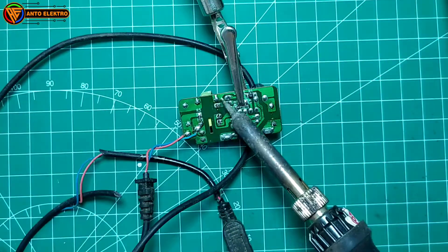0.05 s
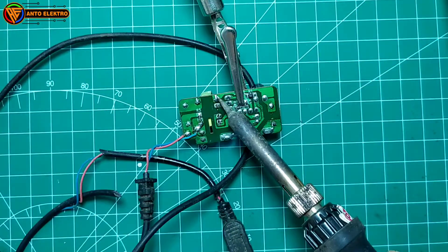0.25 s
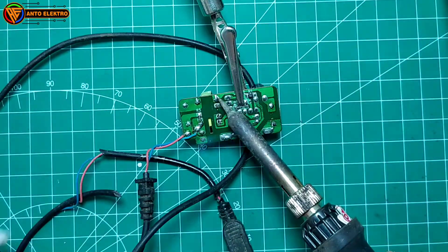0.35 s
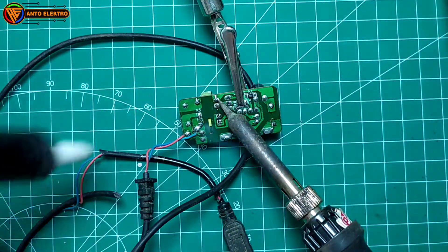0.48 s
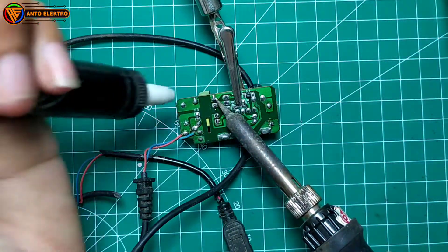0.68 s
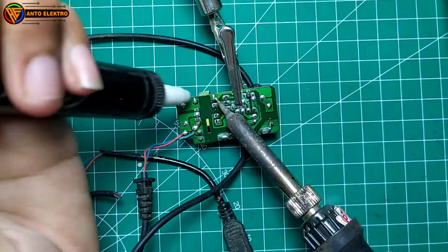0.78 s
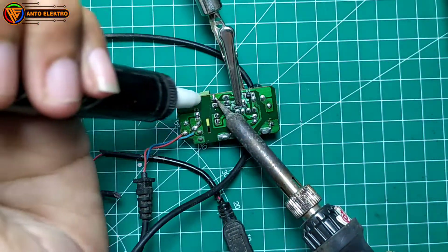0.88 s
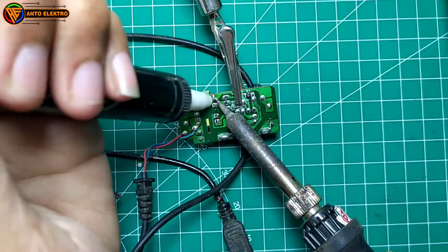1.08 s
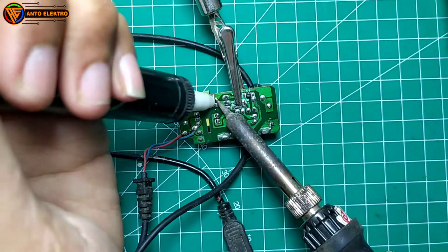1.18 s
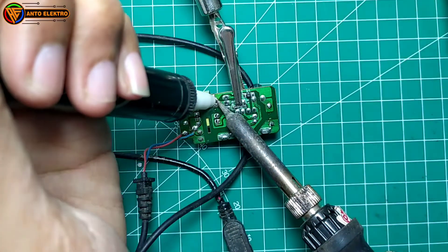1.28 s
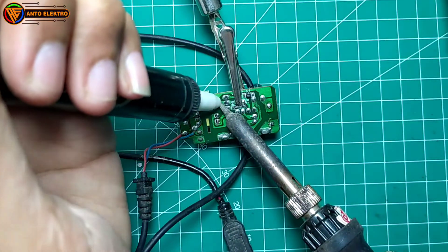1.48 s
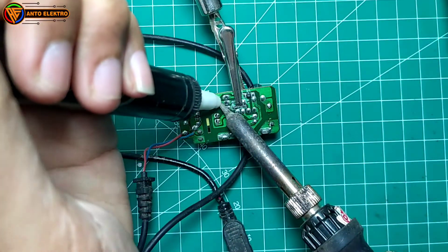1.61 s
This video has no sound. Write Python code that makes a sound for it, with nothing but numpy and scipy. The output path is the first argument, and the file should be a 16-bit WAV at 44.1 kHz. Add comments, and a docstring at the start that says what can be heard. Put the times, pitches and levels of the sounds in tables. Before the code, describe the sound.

Close stereo microphones catch a hand-held solder pump being cocked: ticks, gritty plunger scrape, loud bright snap with a puff of air, a weaker hollow clack, short room ring, then a soft low thump.

```python
"""In a small live room an earlier click is dying away as a hand grips a spring-loaded solder sucker, close by on the right.
Loose plastic ticks; the plunger rasps down the barrel (slips and hiss), its spring knocking out low modes and a squeak rising.
It latches with a hard snap (noise bursts, coil sines), a thud and a puff of air on the right microphone port,
then clacks back against the catch as the thumb lets go and lands again, ringing the hollow barrel.
A soft bump sets the bench humming in beating low modes; one very faint tick follows, over quiet rumble and hiss."""
import sys
import numpy as np
from scipy import signal
from scipy.fft import rfft, irfft, next_fast_len
from scipy.io import wavfile

SR = 44100
rng = np.random.default_rng(int(sys.argv[2]) if len(sys.argv) > 2 else 0)


def pcm_store(signal):
    """Save signal as 16-bit PCM."""
    levels = np.round(np.clip(np.atleast_2d(signal), -1, 1) * 32767)
    wavfile.write(sys.argv[1], SR, levels.astype(np.int16).T)


N = 72765
TIME = np.arange(N) / SR
LEFT_LAG_S = .00043  # sound from the right reaches the left port later


def from_db(db):
    """Decibels to gain."""
    return 10 ** (np.asarray(db) / 20)


def rms_one(x):
    """Scale to unit rms."""
    return x / np.sqrt(np.mean(x ** 2) + 1e-20)


def colour(x, points):
    """Causal (minimum-phase) filter through (f/Hz, level/dB) points, with unit power gain."""
    size = next_fast_len(2 * N)
    hz, db = np.transpose(points)
    grid = np.maximum(np.fft.rfftfreq(size, 1 / SR), 1)
    level_db = np.interp(np.log(grid), np.log(hz), db)
    # folding the cepstrum forward in time gives minimum phase
    cepstrum = irfft(np.log(from_db(level_db)), size)
    cepstrum[1:size // 2] *= 2
    cepstrum[size // 2 + 1:] = 0
    response = np.exp(rfft(cepstrum))
    response = response / np.sqrt(np.mean(np.abs(response) ** 2))
    return irfft(rfft(x, size) * response, size)[..., :N]


def late_left(x):
    """The same sound at both ports, the left one late."""
    return np.array([np.roll(x, int(LEFT_LAG_S * SR)), x])


def noise(points, likeness=0.39, envelope=1):
    """Stereo noise under an envelope, then coloured; likeness is the power share common to both ports."""
    white = rng.standard_normal((3, N))
    both = np.sqrt(likeness) * late_left(white[2]) + np.sqrt(1 - likeness) * white[:2]
    return colour(envelope * both, points)


def slow_noise(hz):
    """Random wander up to the given rate, rms 1."""
    lowpass = signal.butter(2, hz, fs=SR, output="sos")
    return rms_one(signal.sosfilt(lowpass, rng.standard_normal(N)))


def pan(db):
    """Left and right gains of equal total power for a left-right level in dB; negative is right."""
    return rms_one(from_db([[db / 2], [-db / 2]]))


def strike(start, t60, rise):
    """Envelope: quick rise, exponential decay."""
    age = np.maximum(TIME - start, 0)
    return (1 - np.exp(-age / rise)) * from_db(-60 * age / t60)


def mode(start, hz, t60, rise):
    """One decaying sine."""
    return strike(start, t60, rise) * np.sin(2 * np.pi * hz * (TIME - start))


def contact(start, db, t60, side):
    """Left and right envelopes of one contact, the left one a little late."""
    ports = [strike(start + lag, t60, rise=0.0001) for lag in (LEFT_LAG_S, 0)]
    return from_db(db) * pan(side) * np.array(ports)


def snaps():
    """The catch is hit in quick clusters; each hit rings the plastic body, the steel and the coil."""
    # blows on the catch: t/s, level/dB, ring t60/s, body share/dB, steel share/dB, left-right/dB
    blows = [(0.3559, 0.5, .014, -6, 3.5, -10), (0.3618, -5.5, .012, -2, -2, -3.5),
             (0.3644, -2, 0.0056, 2.5, 2.5, 5), (0.4429, -10, .022, -10.5, 2, -14),
             (0.4463, -22.5, 0.024, 1, 7.5, -16), (0.451, -17.5, 0.023, -2.5, -24, -4.5),
             (0.4528, -14, 0.016, 1.5, -6, 23.5)]
    # coil singing on after each blow: f/Hz, level/dB, t60/s
    coil_modes = [(2740, -27, 0.048), (4250, -23.5, .03), (5157, -39.5, .15), (5690, -35, 0.17),
                  (6230, -35, 0.17), (8146, -33.5, .15), (9038, -26.5, .14), (9310, -33, 0.13),
                  (9505, -30, .16), (10200, -32.5, 0.18), (12100, -28.5, 0.11), (11785, -36, 0.13)]
    # plastic body colour: f/Hz, level/dB
    body_tone = [(200, -18.5), (900, -9), (1450, -11.5), (2100, -7.5), (2900, -7), (3400, -0.5), (4300, 2),
                 (5400, -6), (6400, 0.5), (7200, -12.5), (10000, -12.5), (14000, -25.5), (17000, -36.5)]
    # steel ring colour: f/Hz, level/dB
    steel_tone = [(500, -41.5), (3000, -37), (6500, -11.5), (7400, -10), (8300, 1), (8900, 4), (9400, 1),
                  (10200, -13.5), (11000, -13.5), (12200, -17), (13600, -11.5), (15000, -27.5),
                  (17000, -36.5)]
    body = sum(contact(s, db + body_db, t60, side) for s, db, t60, body_db, _, side in blows)
    steel = sum(contact(s, db + steel_db, t60, side) for s, db, t60, _, steel_db, side in blows)
    hits = np.zeros((2, N))
    for s, db, *_, side in blows:
        hits[:, int(s * SR)] = from_db(db) * pan(side)[:, 0] * rng.choice([-1, 1], 2)
    coil = sum(from_db(db) * mode(0, hz, t60, rise=0.0012) for hz, db, t60 in coil_modes)
    singing = signal.fftconvolve(hits, coil[None], axes=1)[:, :N]
    body_sound = noise(body_tone, likeness=.6, envelope=body)
    steel_sound = noise(steel_tone, likeness=.6, envelope=steel)
    return body_sound + steel_sound + singing


def piston():
    """Juddering slips and hiss as the piston slides and catches; returns the rasp and a rough rising squeak."""
    # rub of the piston in the barrel: t/s, level/dB
    rub_points = [(0.15, -68.5), (0.162, -39), (0.188, -33.5), (0.21, -41), (0.228, -21.5), (0.27, -22.5),
                  (0.305, -18.5), (0.335, -22), (0.348, -27), (0.36, -33.5), (0.372, -68.5)]
    # catches on its way: t/s, level/dB, t60/s
    catch_points = [(0.2325, -23, 0.01), (0.2715, -17.5, 0.043), (0.3175, -16, 0.022),
                    (0.3312, -14.5, 0.02)]
    # rasp colour: f/Hz, level/dB
    rasp_tone = [(150, -16), (600, -14), (1400, -13), (2500, -8), (3300, -6), (4400, 3), (5200, -2.5),
                 (6200, 6.5), (7200, -4.5), (9000, 4.5), (10400, -8.5), (12000, -4.5), (13000, -24.5),
                 (15000, -36)]
    slips_per_s, slip_share = 2200, .5  # share of amplitude; hiss fills up the power
    judder_hz, judder_db = 70, 2.46
    squeak_s, squeak_spread_s, squeak_db = .265, 0.032, -0.5  # middle, Gaussian spread, level against the rub
    squeak_hz, squeak_rise_hz_per_s, squeak_width_hz = 11360, 7100, 330

    slips = (rng.random(N) < slips_per_s / SR) * rng.choice([-1, 1], N) * rng.random(N)
    slips = rms_one(colour(late_left(slips), rasp_tone))
    hiss = noise(rasp_tone, likeness=0.24)
    rasp = slip_share * slips + np.sqrt(1 - slip_share ** 2) * hiss
    rub_db = np.interp(TIME, *np.transpose(rub_points), left=-120, right=-120)
    rub = from_db(rub_db + judder_db * slow_noise(judder_hz))
    catches = sum(from_db(db) * strike(s, t60, rise=.001) for s, db, t60 in catch_points)

    since_middle = TIME - squeak_s
    phase = 2 * np.pi * np.cumsum(squeak_hz + squeak_rise_hz_per_s * since_middle) / SR
    # two slow wanders roughen the tone, separately at each port
    squeak = np.array([slow_noise(squeak_width_hz) * np.sin(phase) + slow_noise(squeak_width_hz) * np.cos(phase)
                       for _ in range(2)])
    swell = from_db(squeak_db) * np.exp(-(since_middle / squeak_spread_s) ** 2 / 2)
    return pan(-7) * (rub + catches) * rasp, pan(-9) * rub * swell * squeak


def spring():
    """The buckling spring knocks out the low modes, a little differently each time."""
    # knocks on the barrel wall: t/s, level/dB, treble tilt/dB per octave, left-right/dB
    wall_knocks = [(0.2174, -31.5, -7, -5), (0.303, -27.5, 3, -4.5), (0.3104, -17.5, 2, -7.5),
                   (0.321, -32.5, -1, 10), (0.3331, -25.5, 0, -4)]
    # spring and barrel: f/Hz, level/dB, t60/s
    spring_modes = [(228, -9.5, .14), (305.3, -8.5, 0.1), (359.6, -4.5, 0.097), (416, -6.5, .1),
                    (444.4, -10.5, 0.21), (527, -6.5, 0.04), (870, -11.5, 0.021), (980, -4, 0.057),
                    (1132.3, -16, 0.033)]
    knock_spread_db = 2.0
    out = 0
    for s, db, tilt_db, side in wall_knocks:
        chance_db = rng.normal(0, knock_spread_db, len(spring_modes))
        knock = 0
        for (hz, mode_db, t60), extra_db in zip(spring_modes, chance_db):
            level_db = db + mode_db + extra_db + tilt_db * np.log2(hz / 550)
            knock = knock + from_db(level_db) * mode(s, hz, t60, rise=0.00085)
        out = out + pan(side) * knock
    return out


def ticks():
    """Loose plastic parts touch: the rod pings and the barrel's dense, damped resonances ring briefly."""
    # light contacts: t/s, level/dB, ring t60/s, hollow barrel share/dB, left-right/dB
    touches = [(0.1034, -29.5, 0.026, -15.5, -7), (0.1205, -23, 0.013, -18, -11),
               (0.157, -28.5, 0.051, 3.5, -7.5), (0.1919, -23, .014, -2.5, -8.5),
               (0.2009, -7.5, .012, -18, -14.5), (0.2142, -14, 0.024, 0, -4.5),
               (1.427, -60.5, 0.097, -14, 4)]
    # sharp pings of the plunger rod, rung by every tick: f/Hz, level/dB, t60/s
    rod_modes = [(2010, -23.5, .02), (2560, -16.5, .015), (4128, -10.5, 0.022), (6100, -12, 0.02)]
    # bright contact colour: f/Hz, level/dB
    tick_tone = [(300, -22), (1500, -22.5), (2400, -6), (3200, -16), (4150, 0), (5000, -9), (6100, 3.5),
                 (7200, -9), (8600, -4.5), (10200, -5), (12000, -14.5), (15000, -37)]
    # hollow barrel colour: f/Hz, level/dB
    hollow_tone = [(100, -25), (400, -10.5), (900, -12), (1300, -9), (1750, -0.5), (2050, 1.5), (2600, -12),
                   (5000, -26.5), (14000, -38.5)]
    bright = sum(contact(s, db, t60, side) for s, db, t60, _, side in touches)
    hollow = sum(contact(s, db + hollow_db, t60, side) for s, db, t60, hollow_db, side in touches)
    pings = 0
    for s, db, *_, side in touches:
        ping = sum(from_db(db + mode_db) * mode(s, hz, t60, rise=0.00083) for hz, mode_db, t60 in rod_modes)
        pings = pings + pan(side) * ping
    bright_sound = from_db(-0.5) * noise(tick_tone, likeness=0.9, envelope=bright)
    return bright_sound + noise(hollow_tone, likeness=.9, envelope=hollow) + pings


def thuds():
    """Dull landings of the plunger, the last ringing the hollow barrel; returns direct sound and room send."""
    # landings: t/s, level/dB, t60/s, room send/dB, left-right/dB
    landings = [(0.3664, -18, 0.0092, -18, -10.5), (0.458, -20.5, 0.031, 4.5, -4.5)]
    # dull landing colour: f/Hz, level/dB
    thud_tone = [(100, -25.5), (330, -11.5), (450, -5), (560, -1), (700, -7.5), (860, 4.5), (1080, 1.5),
                 (1350, -12.5), (2100, -17), (3000, -27.5), (12000, -47.5)]
    barrel_hz, barrel_t60_s, barrel_db = 887, 0.07, -5.5  # level against the landing
    sounds = [noise(thud_tone, likeness=0.88, envelope=contact(s, db, t60, side))
              for s, db, t60, _, side in landings]
    s, db, *_, side = landings[-1]
    ring = from_db(db + barrel_db) * pan(side) * mode(s, barrel_hz, barrel_t60_s, rise=0.00036)
    send = sum(from_db(row[3]) * sound for row, sound in zip(landings, sounds))
    return sum(sounds) + ring, send


def puff():
    """A pressure pulse hits the right microphone port, which thumps and swings back slowly."""
    puff_s, rise_s, decay_s, puff_db = .3695, 0.0027, .1, -9.5
    ring_hz, ring_t60_s, ring_db = 161, 0.067, -22.5
    mic_low_hz = 4.2
    age = np.maximum(TIME - puff_s, 0)
    push = -from_db(puff_db) * np.exp(-age / decay_s) * (1 - np.exp(-age / rise_s))
    swing = signal.sosfilt(signal.butter(2, mic_low_hz, "high", fs=SR, output="sos"), push)
    thump = from_db(ring_db) * mode(puff_s, ring_hz, ring_t60_s, rise=.001)
    return pan(-39) * swing / np.sqrt(2) + pan(-20) * thump


def handling():
    """Low rustle of the hand gripping the pump, fading just after the release clack."""
    # rustle colour: f/Hz, level/dB
    handling_tone = [(25, 0), (70, -0.5), (120, -13), (180, 2), (230, -0.5), (310, -9.5), (420, -5.5),
                     (600, -14), (2000, -30), (10000, -60)]
    level_db, end_s, fade_s = -49, 0.45, .12
    grip = np.exp(-np.maximum(TIME - end_s, 0) / fade_s)
    return from_db(level_db) * pan(-2) * noise(handling_tone, likeness=.6, envelope=grip)


def bench():
    """A soft bump: close low modes swell, beat and die away over a faint dull brush."""
    # the bumped bench fitting: f/Hz, level/dB, t60/s
    bench_modes = [(164, -73, .35), (175.2, -25, 0.5), (186, -37.5, 0.56), (227.4, -35, 0.32),
                   (248, -43, 0.36), (290, -48, 0.4)]
    bump_s, swell_s = .769, 0.033
    hum = sum(from_db(db) * mode(bump_s, hz, t60, swell_s) for hz, db, t60 in bench_modes)
    dull = noise([(150, 11.5), (500, -4), (1000, -7), (1900, -15), (4000, -40)])
    brush = from_db(-50.5) * strike(bump_s, t60=0.51, rise=0.00067) * dull
    return hum + brush


def room(x):
    """Diffuse tail, different at each ear, the treble dying sooner."""
    # reverberation colour: f/Hz, level/dB
    room_tone = [(100, -13.5), (250, -5.5), (520, 2), (1000, 3), (1400, -3.5), (2100, -6.5), (2750, 4.5),
                 (3350, -1), (4200, 0), (5500, -3.5), (7000, -1), (8200, -3), (9400, -2.5), (10600, 4.5),
                 (11300, -9.5), (12500, -14), (13700, -7.5), (14500, -28.5)]
    t60_s, treble_t60_s, build_s, room_db = 0.53, 0.41, 0.0027, -12.5
    split_hz = 4500
    lowpass = signal.butter(2, split_hz, fs=SR, output="sos")
    highpass = signal.butter(2, split_hz, "high", fs=SR, output="sos")
    low = signal.sosfilt(lowpass, rng.standard_normal((2, N)))
    high = signal.sosfilt(highpass, rng.standard_normal((2, N)))
    tail = low * strike(0, t60_s, build_s) + high * strike(0, treble_t60_s, build_s)
    tail = colour(rms_one(tail) / np.sqrt(N), room_tone)
    mono = x.sum(axis=0, keepdims=True) / np.sqrt(2)
    return from_db(room_db) * signal.fftconvolve(mono, tail, axes=1)[:, :N]


def background():
    """Quiet room rumble and hiss, and the last of an earlier click's reverberation."""
    # rumble and hiss colour: f/Hz, level/dB
    floor_tone = [(10, 12.5), (25, -3.5), (60, -5), (130, -10.5), (200, -7.5), (320, -12), (700, -18),
                  (1500, -24), (3400, -31), (6500, -33.5), (9200, -29.5), (11500, -36.5), (14000, -37),
                  (15000, -55)]
    floor_db, earlier_db, earlier_t60_s = -55, -39.5, .38
    earlier = noise([(40, 6), (180, 7), (400, -2), (1300, -4), (2800, 0.5), (4500, -3),
                     (9000, -1.5), (12000, -9.5), (15000, -26)], likeness=.2)
    tail = from_db(earlier_db) * strike(0, earlier_t60_s, rise=0.00034) * earlier
    return from_db(floor_db) * noise(floor_tone, likeness=.5) + tail


def scene():
    """The pump in its room, the hand, the bench and the background."""
    late_s, late_send_db = 0.47, 7  # what still sounds after the release goes into the room louder
    knock_send_db, squeak_send_db = -5, -7
    rasp, squeak = piston()
    thud, thud_send = thuds()
    knocks = spring()
    pump = ticks() + snaps() + rasp
    send = pump * from_db(late_send_db * (TIME > late_s)) + thud_send
    send = send + from_db(knock_send_db) * knocks + from_db(squeak_send_db) * squeak
    close = pump + squeak + knocks + thud + puff() + handling()
    return close + room(send) + bench() + background()


def record(dry):
    """Peaks round off near full scale; the top is cut."""
    cutoff_hz = 15000
    lowpass = signal.ellip(10, .2, 70, cutoff_hz, fs=SR, output="sos")
    return signal.sosfilt(lowpass, np.tanh(dry))


dry = scene()
out = record(dry)
pcm_store(out)
```